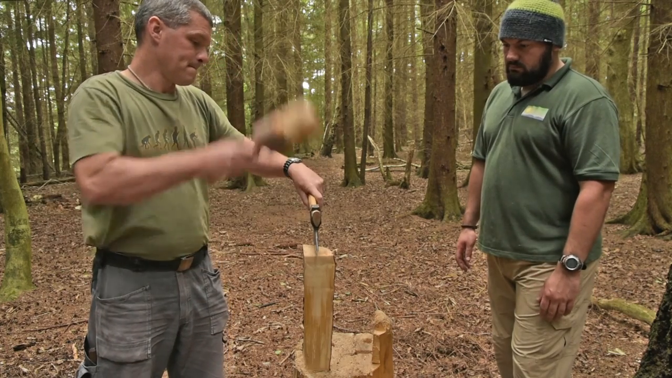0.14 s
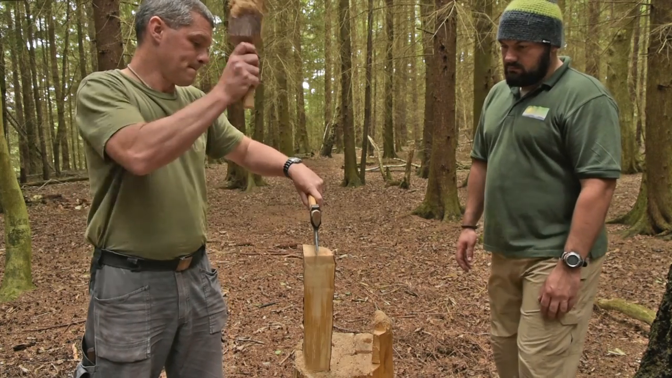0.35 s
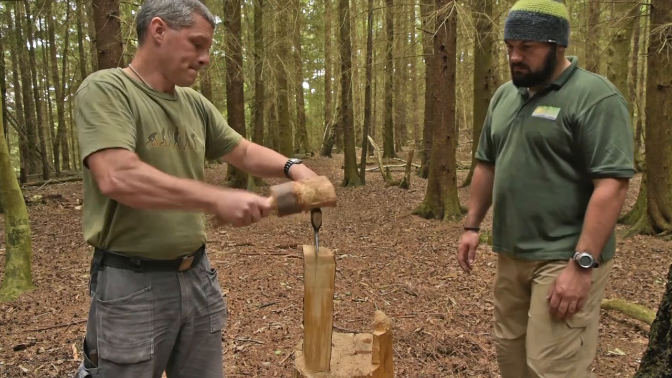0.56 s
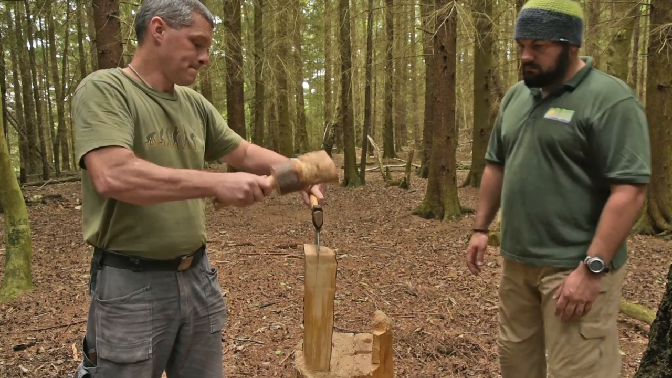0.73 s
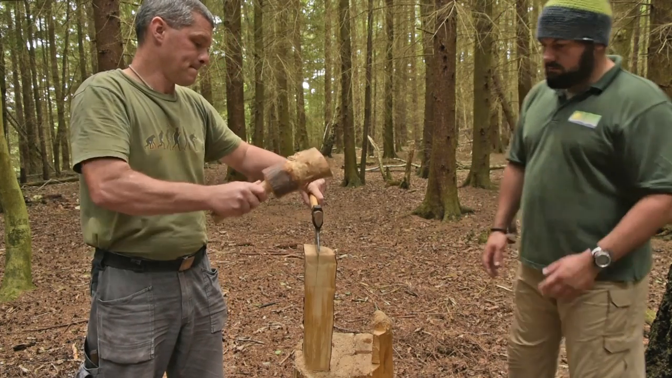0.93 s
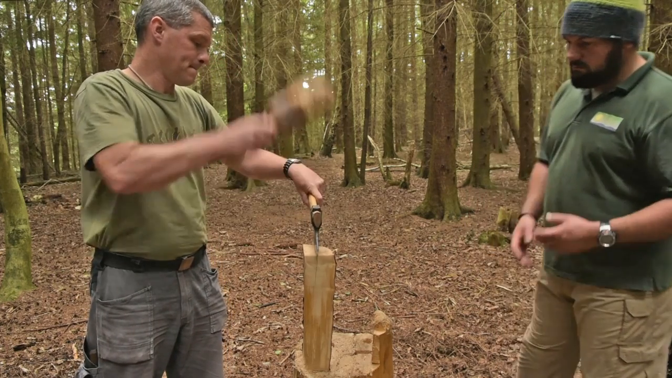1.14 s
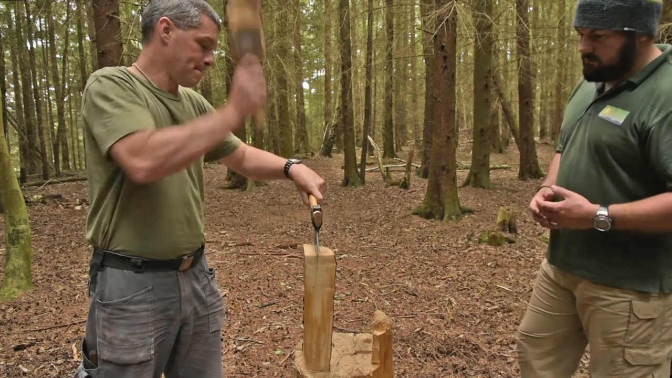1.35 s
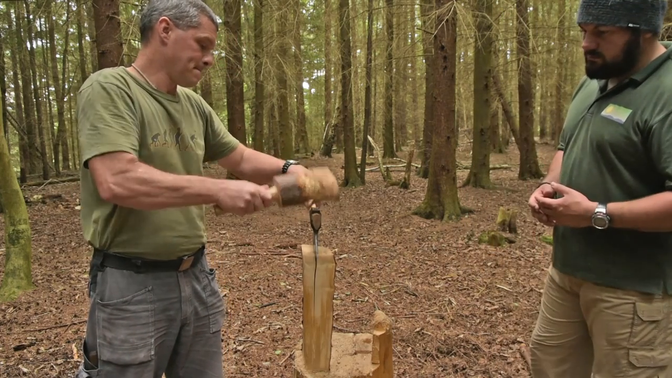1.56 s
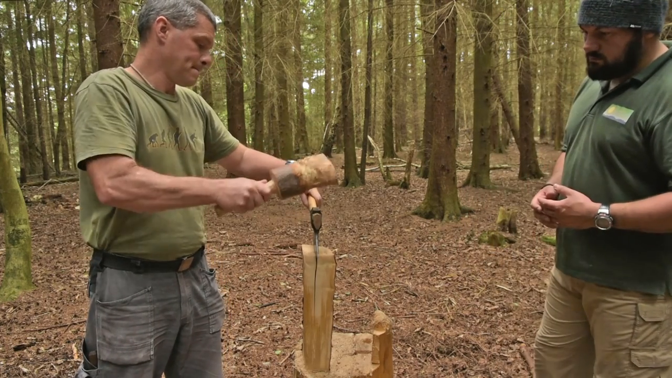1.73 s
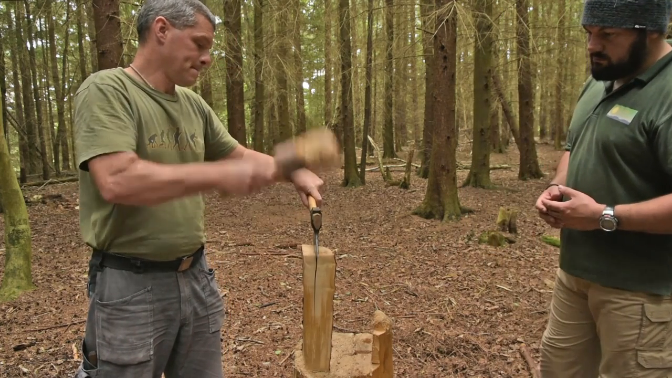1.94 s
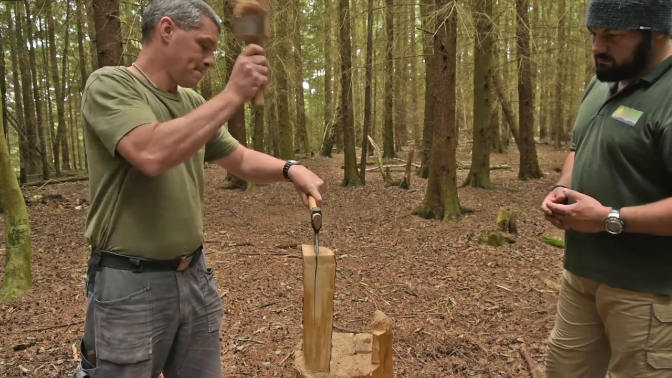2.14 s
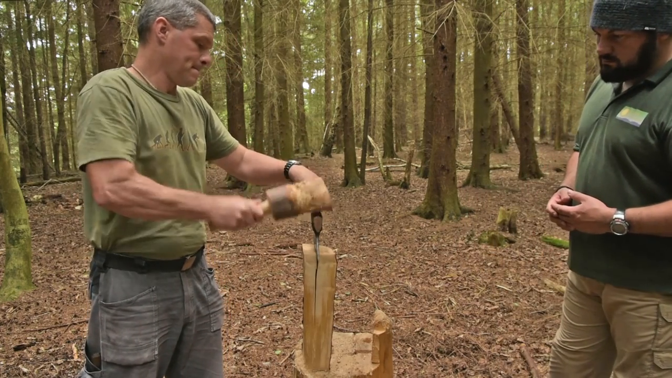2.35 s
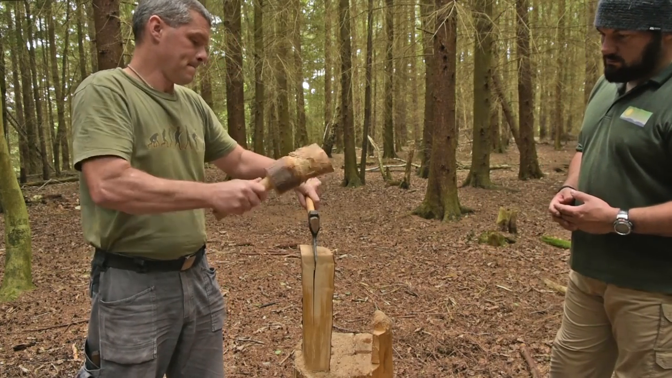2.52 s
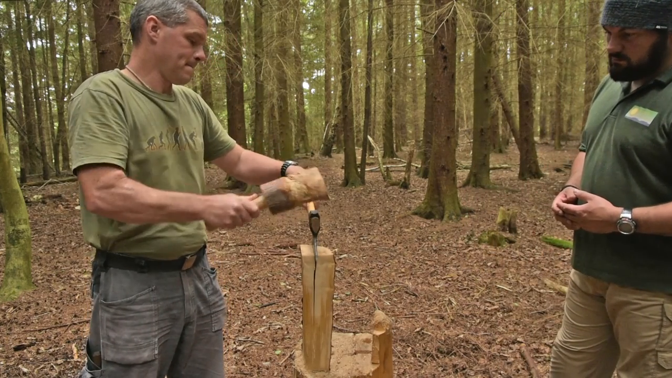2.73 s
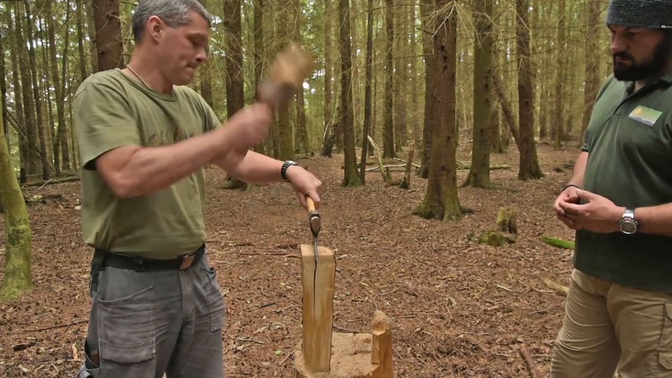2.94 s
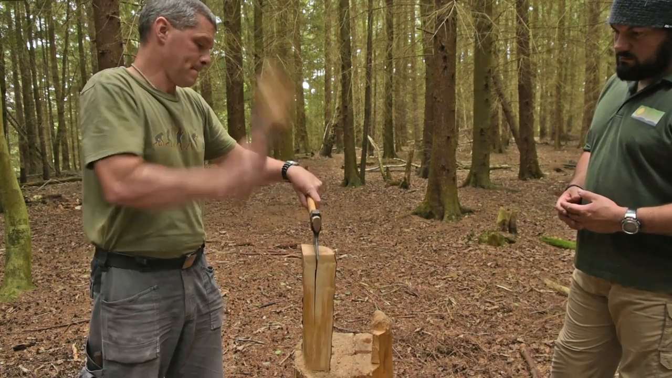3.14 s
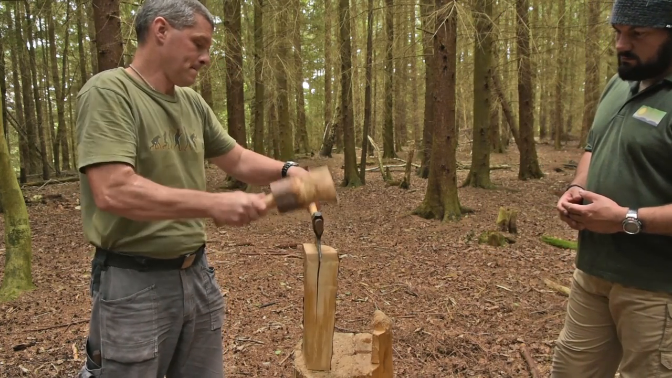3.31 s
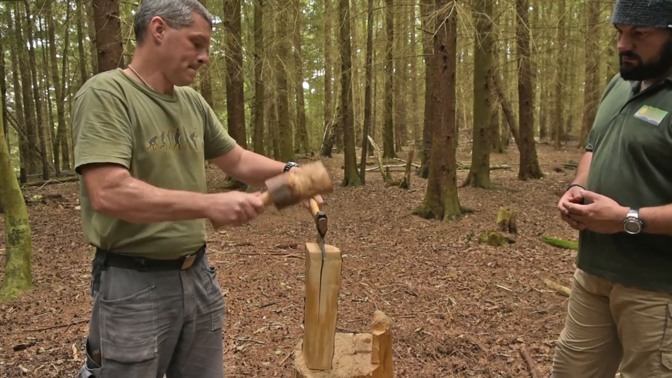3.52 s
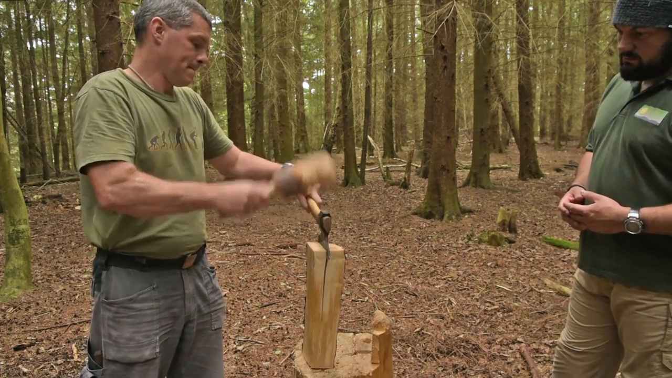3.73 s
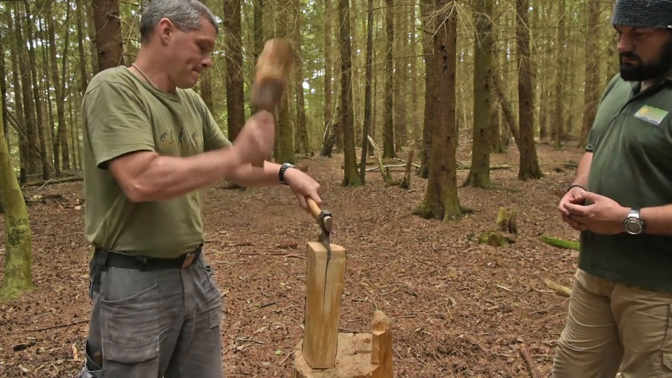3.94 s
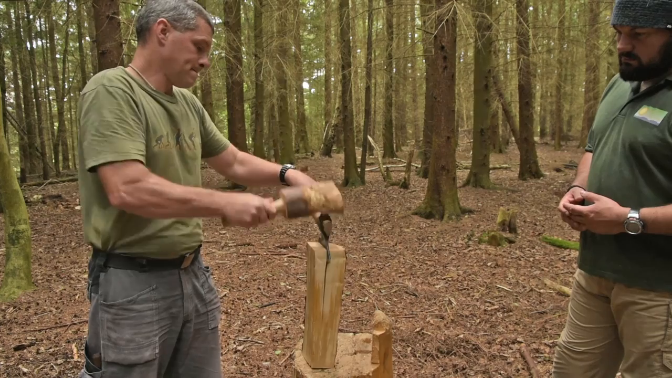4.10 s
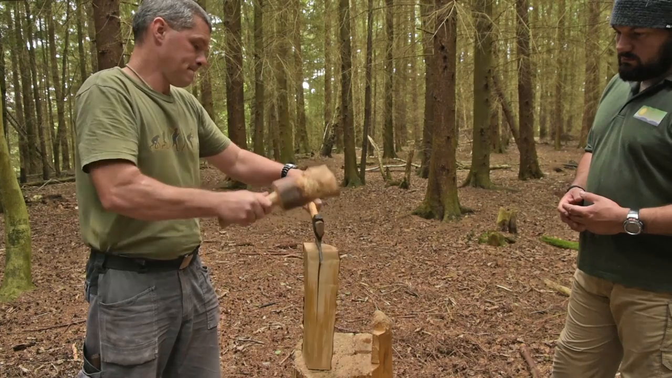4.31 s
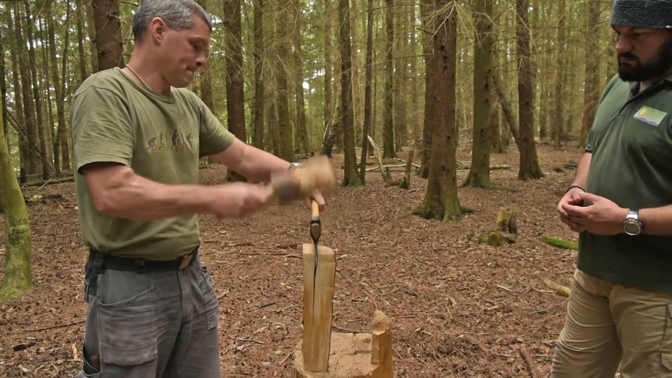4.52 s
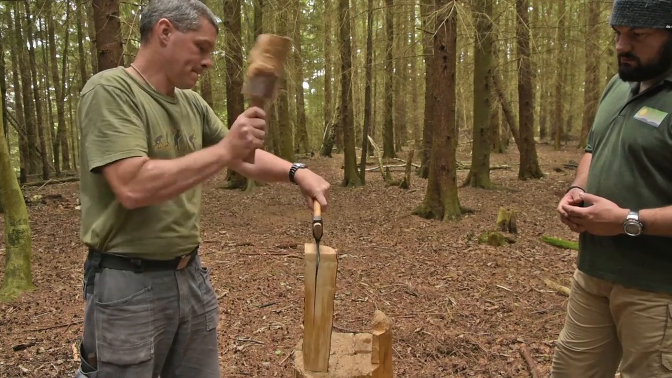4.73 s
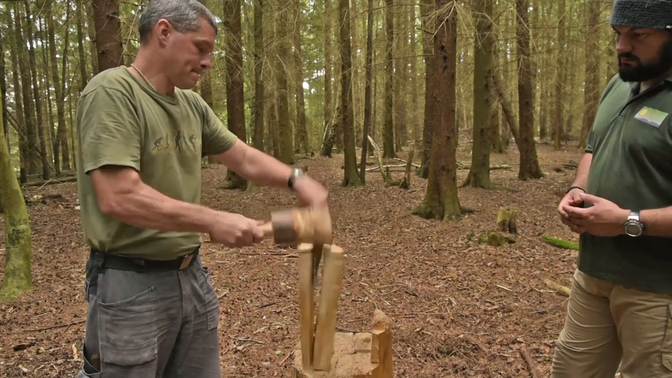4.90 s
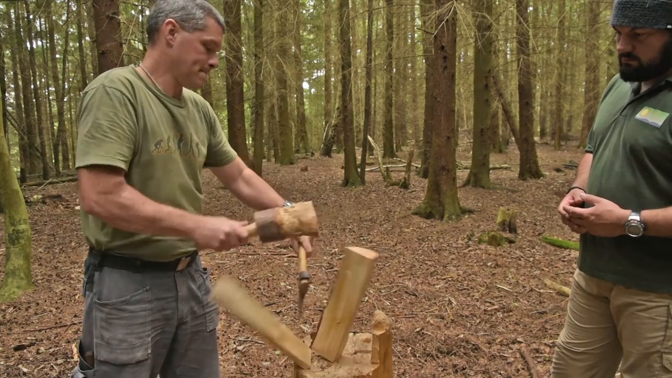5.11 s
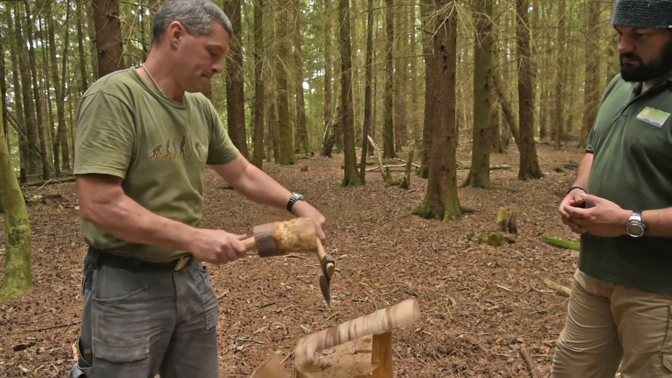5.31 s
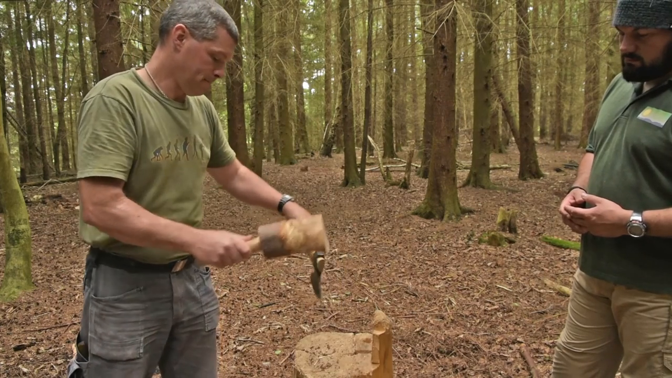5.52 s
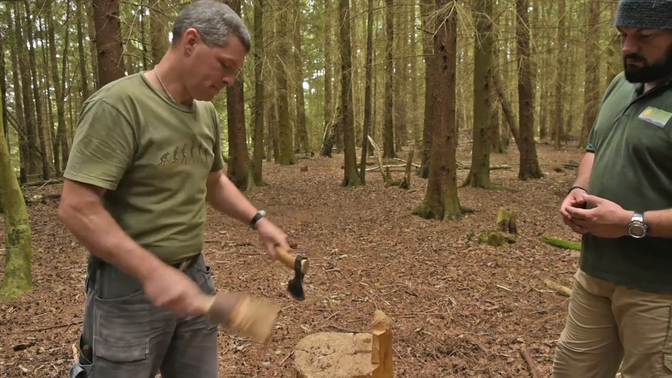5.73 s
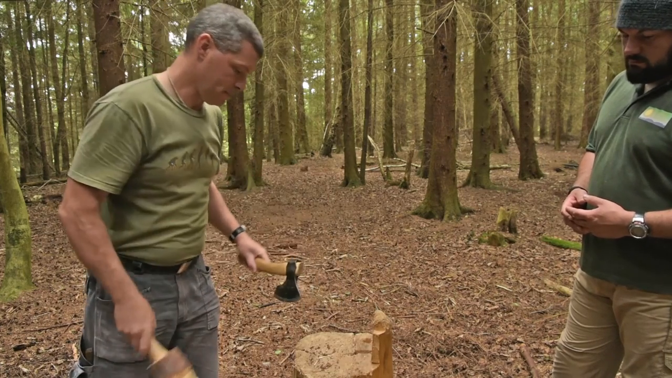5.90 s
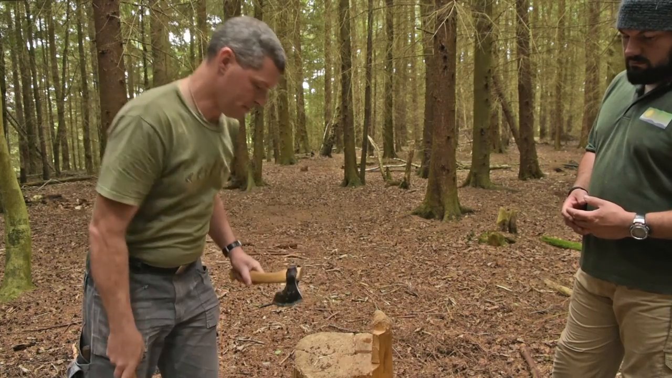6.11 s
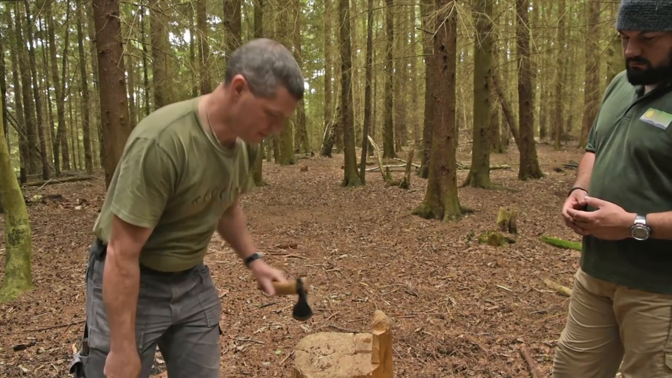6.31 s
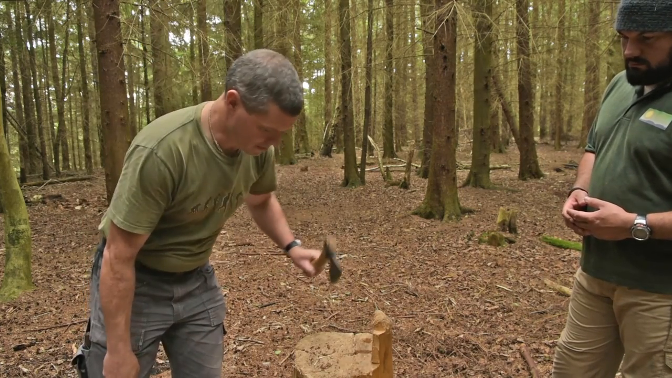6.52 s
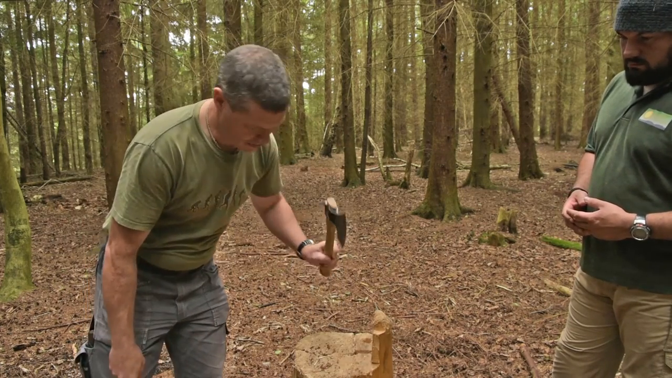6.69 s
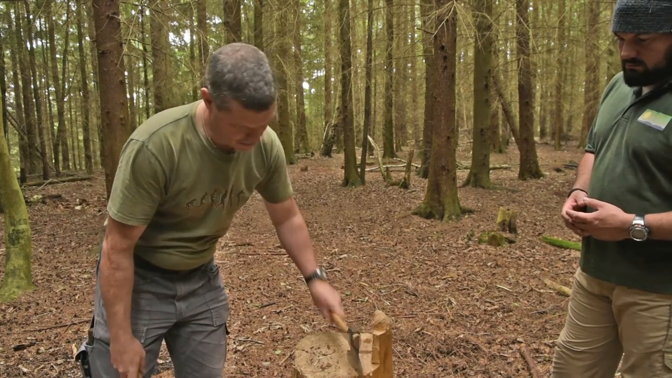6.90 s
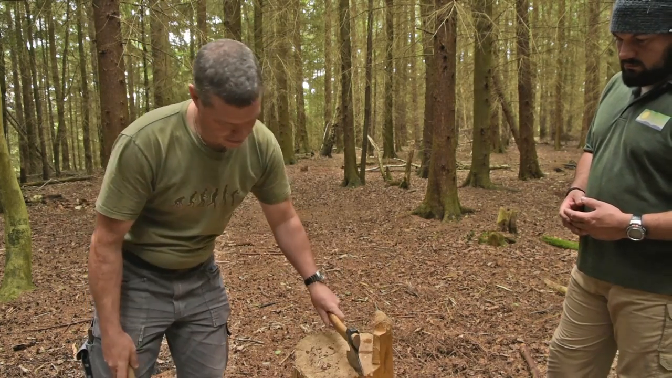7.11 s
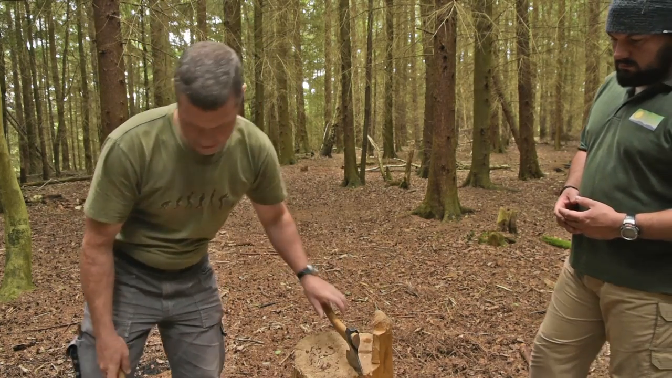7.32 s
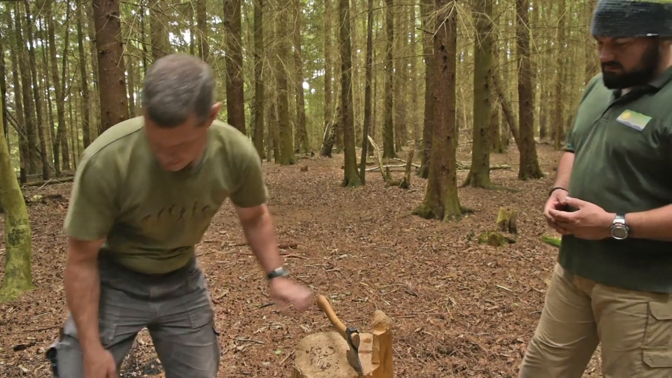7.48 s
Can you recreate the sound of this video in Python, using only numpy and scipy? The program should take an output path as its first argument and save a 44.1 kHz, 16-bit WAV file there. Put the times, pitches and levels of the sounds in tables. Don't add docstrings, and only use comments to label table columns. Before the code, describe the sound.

A wooden mallet knocks a hatchet into a green log in six steady blows, the log splits, and pieces tumble with hard wooden clatter in a forest.

```python
import sys
import numpy as np
from scipy import signal
from scipy.fft import rfft, irfft, next_fast_len
from scipy.io import wavfile
from scipy.ndimage import uniform_filter1d, map_coordinates

SR = 44100
rng = np.random.default_rng(int(sys.argv[2]) if len(sys.argv) > 2 else 0)


def int16_out(signal):
    q = np.round(np.clip(np.atleast_2d(signal).T, -1, 1) * 32767)
    wavfile.write(sys.argv[1], SR, q.astype(np.int16))


def makeup_ratio(level_db):
    decades = np.asarray(level_db, float) / 20
    return 10 ** decades


N = 332955

# t/s, peak level/dB, crack re peak/dB, lift of upper modes/dB, mallet head ring/dB
BLOWS = [
    (-.27, -3, -19.5, 6.5, 4.5),
    (.63, 3, -21, -2, 4),
    (1.5414, 0.5, -13, -10, 8.5),
    (2.3945, 1.5, -18, -4, 6.5),
    (3.2758, -0.5, -16, 1.5, 11.5),
    (4.1142, 0.5, -17, 2, 1.5),
    (4.9439, 2, -14, 6.5, 3.5),
]
# f/Hz, level/dB, t60/s
LOG_MODES = [(260, -10, 0.02), (420, -11.5, .03), (608, -6.5, 0.012), (691, 0.5, 0.12), (937, 1, 0.12),
             (1120, -10.5, 0.014), (1112, 1, 0.053), (1360, -6.5, 0.012), (2130, -5.5, 0.022),
             (2400, -14.5, 0.06), (2666, -10.5, 0.022), (3190, -16, .03)]
LOG_SCATTER_DB, LOG_SCATTER = 2.5, .012
UPPER_HZ = 1000
HEAD_HZ, HEAD_S = 728, 0.14
WEDGE_HZ, WEDGE_RISES_HZ, WEDGE_DB, WEDGE_S = 1490, 78, -2, 0.067
BLOW_CRACK_S, BLOW_FOREST_DB = .055, -10.5
GRIND_S, GRIND_GROWS_S = 0.0094, 0.0015

# earth/dB, thump/dB, thump f/Hz, stump ring/dB
PUSHES = [
    (-12, -2.5, 205, -27.5),
    (-10.5, -29, 230, -25),
    (-11.5, -9, 250, -26.5),
    (-13, -14.5, 210, -21),
    (-22.5, -16.5, 300, -22),
    (-13.5, -19, 210, -23),
]
# f/Hz, t60/s, scuff re peak/dB
EARTH = (330, 0.049, -1.5)
# t60/s, scuff re peak/dB
THUMP = (.045, -21.5)
# f/Hz, t60/s, scuff re peak/dB
STUMP_RING = (154, 0.16, -19)
# level/dB, f/Hz, t60/s, scuff re peak/dB
SHUDDER = (-50, 85, 0.42, -26.5)
PUSH_LAG_S, THUMP_LAG_S, SHUDDER_LAG_S = .006, .01, .11

# t/s, peak level/dB, crack re peak/dB, forest re knock/dB, grinding/s
SPLINTER = [
    (4.956, -6, -36, -28, .002),
]
PARTING = [
    (5.156, -23, -14, -22, .002),
]
SCRAPE = [
    (5.35, -19.5, -27, -27, .033),
]
NEAR_HALF = [
    (5.499, -37, -5.5, -15.5, 0.01),
    (5.522, 5.5, -27, -31, .002),
]
FAR_HALF = [
    (5.762, 2, -17, -25, 0.0065),
    (5.777, -4.5, -14.5, -38, 0.0018),
    (5.79, -10.5, -27.5, -29, .001),
]
MALLET = [
    (6.051, 10.5, -23, -27.5, .004),
    (6.077, -8, -15, -23, .0098),
    (6.1215, -3.5, -34, -25.5, 0.0044),
    (6.14, -23, -22.5, -25, 0.026),
    (7.012, -6.5, -33, -20.5, .0025),
    (7.049, -10.5, -31.5, -23, 0.0023),
]
ROLL = [
    (6.425, -12, -14.5, -20, 0.0049),
    (6.433, -3.5, -19, -31, .005),
]
TAP = [
    (6.595, -38, -6.5, -20, .0042),
    (6.605, -34, -22, -44, .002),
]
CHOP = [
    (6.989, -5, -6.5, -29, 0.00049),
    (6.991, 5, -42, -18.5, 0.0088),
]

# f/Hz, level/dB, t60/s
SLIVER_MODES = [(2760, .1, .12), (4800, -16, .05)]
PARTING_MODES = [(1102, 5, 0.12), (1880, -1, .05)]
SCRAPE_MODES = [(560, -4, .03), (762, 0, 0.04), (1000, -3, .03), (1245, -4, 0.03), (1600, -2, 0.03),
                (1900, -6, .03)]
NEAR_MODES = [(115, -17.5, 0.25), (190.6, -5, 0.064), (352, 6, 0.029), (419, -4.5, 0.05), (627, -5, 0.034),
              (824, 2, 0.038), (1160, -17.5, .025), (1917, 0, 0.042), (3140, -18.5, 0.012)]
FAR_MODES = [(165, -6.5, .3), (335, 10, 0.035), (486, 10.5, 0.031), (678, -8.5, .4), (855, -7.5, 0.076),
             (1174, -20.5, 0.035), (1368, -16.5, 0.19), (1626, -2, 0.034), (3090, -1.5, 0.017),
             (4320, -8.5, 0.041), (5770, -11, 0.011)]
MALLET_MODES = [(562, -8.5, 0.085), (710, 0, 0.11), (875, -3.5, 0.032), (1080, -8, 0.08), (1200, 3, 0.045),
                (1346, 1.5, 0.055), (1500, -3.5, 0.061), (1610, 3.5, 0.075), (1914, 2, 0.071),
                (2230, -9, 0.037), (2360, -6, 0.076), (2900, -18.5, .035), (3150, -6.5, 0.041),
                (3510, -13.5, 0.073)]
ROLL_MODES = [(252, 4, 0.014), (553, -0.5, 0.026), (792, -12, 0.15), (1460, -11, 0.026),
              (2310, -17.5, 0.03)]
TAP_MODES = [(805, .1, .15), (1550, -12, .03)]
STUMP_MODES = [(760, 13, 0.065), (1230, -42, 0.072), (1481, -10.5, 0.047), (1625, -26.5, 0.29),
               (1631, -44, 0.11), (1970, -19, 0.042), (3060, -46.5, 0.19)]

# f/Hz, level/dB
CRACK = [(40, -43.5), (150, -8), (1000, 6.5), (2500, -3.5), (4000, -9), (5200, -9.5), (8000, -20),
         (16000, -35.5)]
# f/Hz, t60/s
TRUNKS = [(100, 0.22), (300, 0.92), (800, 1.29), (2000, 1.173), (5000, 0.94), (9000, 0.7), (15000, 1.3)]
# f/Hz, level/dB
ECHO = [(100, -16), (300, -12.5), (600, -5), (1100, -3.5), (1700, 2), (3600, 2.5), (5000, 7), (12000, 5)]
SPAN = int(1.4 * SR)

# t/s, peak level/dB, f/Hz, t60/s, scuff re peak/dB
THUDS = [(.702, -22.5, 250, 0.043, -7), (3.7258, -25, 229, 0.066, -15), (3.7265, -33, 760, 0.046, -53),
         (3.724, -28.5, 436, 0.028, -44), (3.75, -43, 177, 0.1, -40), (5.337, -20, 245, 0.035, -8),
         (5.707, -12.5, 260, 0.013, -17), (5.834, -10.5, 224, 0.029, -16.5), (5.78, -31.5, 167, .55, -30),
         (6.035, -38, 190, 0.4, -15), (6.44, -43, 147, 0.3, -15), (6.99, 5.5, 265, 0.027, -5.5),
         (6.994, -23, 114, 0.15, -33), (7.029, -36, 158, 0.19, -7)]
# t/s, peak level/dB, f/Hz
SNAPS = [(1.273, -41, 4890), (1.4356, -52, 4950), (2.1102, -32.5, 3980), (2.124, -40.5, 4240),
         (4.0257, -52, 4530), (5.0332, -6.5, 5800), (5.0372, -16.5, 5630), (5.0574, -15.5, 5780),
         (5.0636, -21.5, 5220), (5.0784, -17, 4670), (5.245, -33.5, 2600), (5.293, -37, 5260),
         (6.2147, -28.5, 4770), (6.2567, -29, 4300), (6.4882, -34.5, 6400), (6.8044, -41.5, 4930)]
# t/s, level/dB, rise/s, hold/s, fall/s (rise and fall over 20 dB)
RUSTLE = [
    (.4, -56, 0.072, 0.0078, 0.23),
    (1.272, -56, 0.079, 0.2, 0.21),
    (2.116, -60.5, .01, 0, .2),
    (4.026, -63.5, 0.014, 0.011, 0.024),
    (7.4, -55.5, .3, 0, 0.33),
]
# t/s, level/dB, rise/s, hold/s, fall/s (rise and fall over 20 dB)
TUMBLE = [
    (5.04, -39.5, .05, 0.035, 0.13),
    (5.2, -53.5, .1, 0.0014, 0.53),
    (5.368, -60, 0.16, 0, 0.061),
    (5.714, -42.5, 0.015, 0, 0.039),
    (5.834, -30, 0.0075, 0, 0.033),
    (6.046, -32.5, 0.069, 0, 0.008),
    (6.226, -45.5, 0.13, 0, 0.1),
    (6.41, -49, .1, 0, 0.06),
    (6.606, -42, .07, 0, 0.036),
    (6.66, -62, 0.038, 0, 1),
]
# f/Hz, density level/dB per Hz
NEEDLES = [(880, -17.5), (1500, -16), (3210, -6), (3750, -10), (5450, -4), (9270, -16.5), (15000, -38)]
# f/Hz, density level/dB per Hz
LITTER = [(150, -15), (400, -1.5), (1500, -2), (3500, -2), (5500, 2), (9000, -10.5), (15000, -21.5)]
# t/s, level/dB, rise/s, hold/s, fall/s
SQUEAK = [
    (6.75, -53, .035, 0, 0.03),
    (6.81, -50, .03, 0, .03),
]
# f/Hz, level/dB
SQUEAK_TONES = [(1000, 1), (1985, -11), (2975, -11), (3980, -11)]

# f/Hz, density level/dB per Hz
AIR = [(88, -37.5), (150, -4.5), (670, -4.5), (986, -12), (1770, -14.5), (2070, -24), (6000, -36),
       (7800, -61)]
# f/Hz, density level/dB per Hz
RUMBLE = [(20, -57), (38, -26.5), (48, -13), (58, 1.8), (90, -12.5), (120, -2.5), (150, -21), (200, -40.5)]
# t/s, change/dB
GAIN_STEPS = [
    (5.77, 10),
    (6.2, -4.5),
    (6.44, 3.5),
]
AIR_DB, HISS_DB, GAIN_GLIDE_S = -52, -67.5, .05
TOP_HZ, EDGE_HZ, EDGE_DB = 16390, 15700, -12


def blows():
    track = np.zeros(N)
    for k, (s, db, crack_db, tilt_db, head_db) in enumerate(BLOWS):
        luck = rng.standard_normal((len(LOG_MODES), 2))
        modes = []
        for (hz, level, t60), (pitch, gain) in zip(LOG_MODES, luck):
            level = level + LOG_SCATTER_DB * gain + tilt_db * (hz > UPPER_HZ)
            modes.append((hz * (1 + LOG_SCATTER * pitch), level, t60))
        modes.append((HEAD_HZ, head_db, HEAD_S))
        modes.append((WEDGE_HZ + WEDGE_RISES_HZ * k, WEDGE_DB + .5 * tilt_db, WEDGE_S))
        contact = (s, db, crack_db, BLOW_FOREST_DB, GRIND_S + GRIND_GROWS_S * k)
        knock(track, contact, modes, BLOW_CRACK_S, drive_db=6, rise=.0003, longest=.048)
    return track


def loose_wood():
    track = np.zeros(N)
    for contacts, modes, crack_t60 in [
            (SPLINTER, SLIVER_MODES, .02), (PARTING, PARTING_MODES, .047), (NEAR_HALF, NEAR_MODES, .05),
            (FAR_HALF, FAR_MODES, .04), (MALLET, MALLET_MODES, .045), (ROLL, ROLL_MODES, .009),
            (TAP, TAP_MODES, .03), (SCRAPE, SCRAPE_MODES, .04), (CHOP, STUMP_MODES, .015)]:
        for contact in contacts:
            knock(track, contact, modes, crack_t60, drive_db=0.5, rise=0.00055, longest=0.31)
    return track


def knock(track, contact, modes, crack_t60, drive_db, rise, longest):
    s, db, crack_db, wet_db, grind = contact
    t = np.arange(SR // 3) / SR
    ring = np.zeros(len(t))
    for hz, level, t60 in modes:
        ring += makeup_ratio(level - 60 * t / np.clip(t60, .01, longest)) * np.sin(2 * np.pi * hz * t)
    force = 0.066 * rng.standard_normal(2048) * np.clip((grind - t[:2048]) / 0.007, 0, 1)
    force[0] = 1
    body = signal.fftconvolve(ring, force)[:len(t)]
    body /= np.abs(body).max()
    onset = 1 - np.exp(-t / rise)

    fibres = makeup_ratio(-60 * np.maximum(t - grind, 0) / max(crack_t60, .005)) + 1.2 * makeup_ratio(-60 * t / 0.013)
    click = 3 * uniform_filter1d(rng.standard_normal(len(t)), size=5) * makeup_ratio(-60 * t / 0.00088)
    lowest = min(hz for hz, *_ in modes)
    thinned = [(hz, level - 9 * max(np.log2(lowest / hz), 0)) for hz, level in CRACK]
    crack = onset * noise(len(t), thinned) * fibres + click
    add(track, s, makeup_ratio(db + drive_db) * (onset ** 2 * body + makeup_ratio(crack_db) * crack))

    first = np.abs(rfft((ring * np.exp(-t / 0.0078))[:4096])) / np.abs(ring).max()
    grid = np.fft.rfftfreq(4096, 1 / SR)

    def colour(hz):
        return np.hypot(np.interp(hz, grid, first), makeup_ratio(crack_db + 31 + along(CRACK, hz)))

    size = SPAN if db + wet_db > -18 else SPAN // 2
    tail = forest(colour, size, near_db=12.5, near_t60=0.22)
    add(track, s, makeup_ratio(db + drive_db + wet_db - 15.5) * tail)


def forest(colour, size, near_db, near_t60):
    hz, t, z = signal.stft(rng.standard_normal(size), SR, nperseg=512)
    fade = makeup_ratio(-60 * t / along(TRUNKS, hz)[:, None]) + makeup_ratio(near_db - 60 * t / near_t60)
    fade /= np.linalg.norm(fade, axis=1).mean()
    clumps = uniform_filter1d(rng.standard_normal(z.shape), size=4, axis=0)
    clumps = uniform_filter1d(clumps, size=40, axis=1)
    fade *= makeup_ratio(1.2 * unit(clumps))
    tint = colour(hz) * makeup_ratio(along(ECHO, hz))
    tail = signal.istft(z * fade * tint[:, None], SR, nperseg=512)[1]
    return tail * np.clip(np.arange(len(tail)) / SR / 0.041, 0, 1)


def ground():
    rows = []
    for (s, *_), (earth_db, thump_db, thump_hz, ring_db) in zip(BLOWS[1:], PUSHES):
        rows.append((s + PUSH_LAG_S, earth_db, *EARTH))
        rows.append((s + THUMP_LAG_S, thump_db, thump_hz, *THUMP))
        rows.append((s + PUSH_LAG_S, ring_db, *STUMP_RING))
        rows.append((s + SHUDDER_LAG_S, *SHUDDER))
    return rows


def thuds():
    track, t = np.zeros(N), np.arange(SR // 3) / SR
    litter = [(60, -37.5), (200, -1.5), (700, 7.5), (1800, -29), (4000, -27), (12000, -41.5)]  # f/Hz, level/dB
    for s, db, hz, t60, scuff_db in THUDS + ground():
        shape = makeup_ratio(-60 * t / max(t60, .01)) * (1 - np.exp(-t / 0.0014))
        push = shape * np.sin(2 * np.pi * hz * t)
        scuff = makeup_ratio(scuff_db) * noise(len(t), litter) * shape ** .6
        add(track, s, makeup_ratio(db + 3) * (push + scuff))
    return track


def snaps():
    track, t = np.zeros(N), np.arange(SR // 20) / SR
    for s, db, hz in SNAPS:
        spike = np.cos(2 * np.pi * hz * t) * np.exp(-t * hz * 1.1) * (1 - np.exp(-t * SR / 2))
        wisp = 0.58 * uniform_filter1d(rng.standard_normal(len(t)), size=4) * makeup_ratio(-60 * t / 0.017)
        add(track, s, makeup_ratio(db + 3.5) * (spike + wisp))
    return track


def squeak():
    phase = 2 * np.pi * np.cumsum(1 + 0.006 * wobble(34)) / SR
    return swells(SQUEAK) * sum(makeup_ratio(db) * np.sin(hz * phase) for hz, db in SQUEAK_TONES)


def rustle():
    return stirred(RUSTLE, NEEDLES, rough_db=1.0) + stirred(TUMBLE, LITTER, rough_db=4.0)


def stirred(rows, spectrum, rough_db):
    roughness = makeup_ratio(rough_db * (wobble(500) + .4 * wobble(40)))
    return swells(rows) * unit(noise(N, spectrum) * roughness)


def swells(rows):
    t = np.arange(N) / SR
    gain = np.zeros(N)
    for s, db, rise, hold, fall in rows:
        before = np.maximum(s - t, 0) / max(rise, .003)
        after = np.maximum(t - s - abs(hold), 0) / max(fall, .003)
        gain += makeup_ratio(db - 20 * before - 20 * after)
    return gain


def air():
    wind = makeup_ratio(AIR_DB - 3 + .8 * wobble(1.5) + .6 * wobble(9)) * noise(N, AIR)
    rumble = makeup_ratio(-63.5) * makeup_ratio(wobble(4)) * noise(N, RUMBLE)
    t = np.arange(N) / SR
    gain_db = sum(db * np.clip((t - s) / GAIN_GLIDE_S, 0, 1) for s, db in GAIN_STEPS)
    hiss = makeup_ratio(HISS_DB + gain_db) * rng.standard_normal(N)
    return wind + rumble + hiss


def noise(size, spectrum):
    m = next_fast_len(size)
    gain = makeup_ratio(along(spectrum, np.fft.rfftfreq(m, 1 / SR)))
    return unit(irfft(rfft(rng.standard_normal(m)) * gain, m)[:size])


def wobble(rate):
    knots = rng.standard_normal(int(N * rate / SR) + 4)
    return map_coordinates(knots, [np.arange(N) * rate / SR])


def along(points, hz):
    f, v = np.transpose(points)
    return np.interp(np.log(hz + 1), np.log(f + 1), v)


def unit(x):
    return x / np.sqrt(np.mean(x ** 2) + 1e-20)


def add(track, s, sound):
    at = round(s * SR)
    piece = sound[max(-at, 0):N - at]
    track[max(at, 0):][:len(piece)] += piece


def scene():
    low_cut = signal.butter(3, 85, "high", fs=SR, output="sos")
    contacts = signal.sosfilt(low_cut, blows() + loose_wood() + thuds() + snaps())
    return (contacts + squeak() + rustle() + air())[None]


def top_cut(x):
    return signal.sosfilt(signal.butter(12, 16390, fs=SR, output="sos"), x)


def record(dry):
    clipped = dry / (1 + np.abs(dry / .995) ** 20) ** (1 / 20)
    m = next_fast_len(N)
    hz = np.fft.rfftfreq(m, 1 / SR)
    band = np.where(hz < EDGE_HZ, 1, makeup_ratio(EDGE_DB)) * (hz < TOP_HZ)
    limited = irfft(rfft(clipped, m) * band, m)[:, :N]
    return top_cut(limited)


dry = scene()
out = record(dry)
int16_out(out)
```